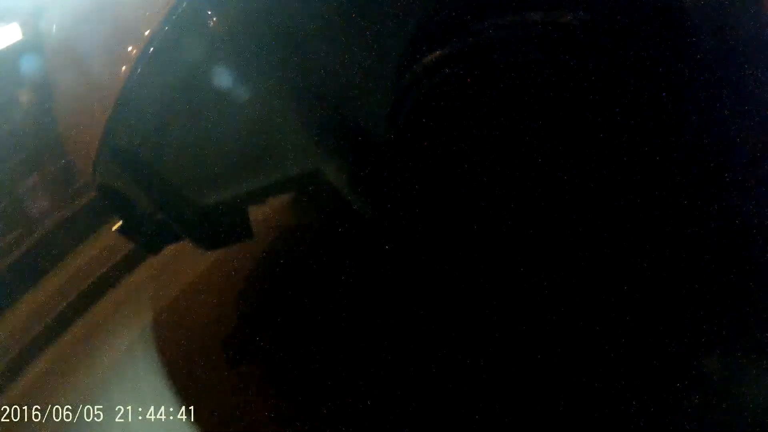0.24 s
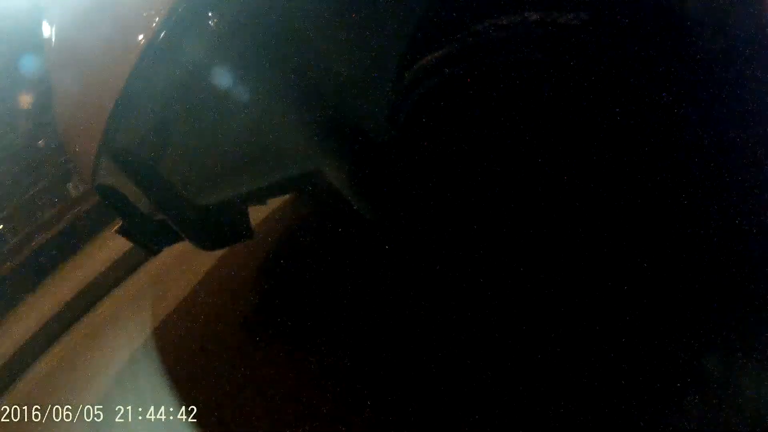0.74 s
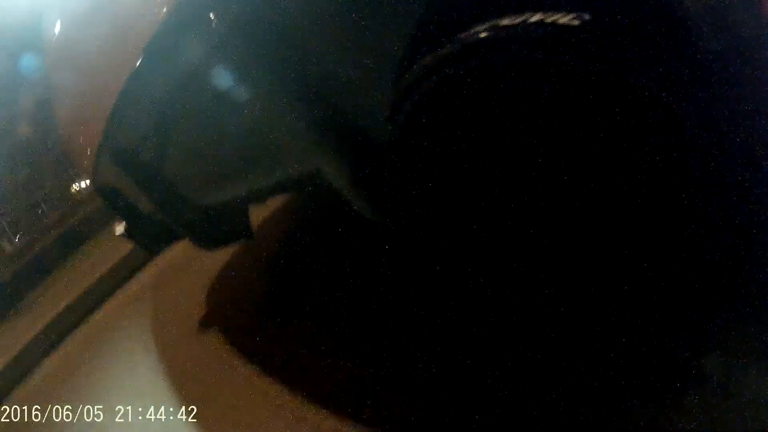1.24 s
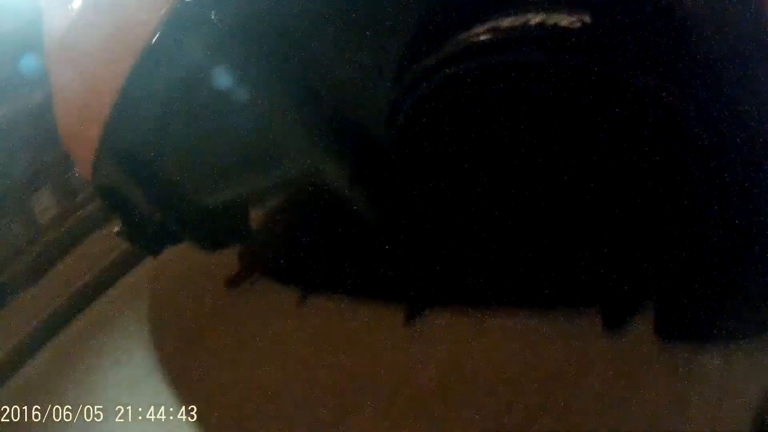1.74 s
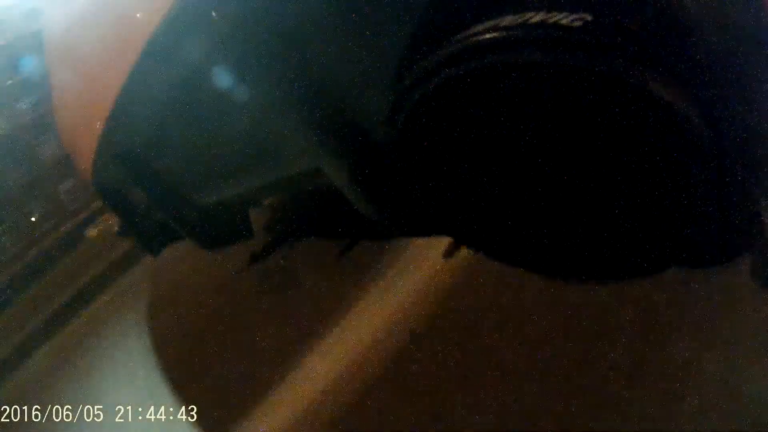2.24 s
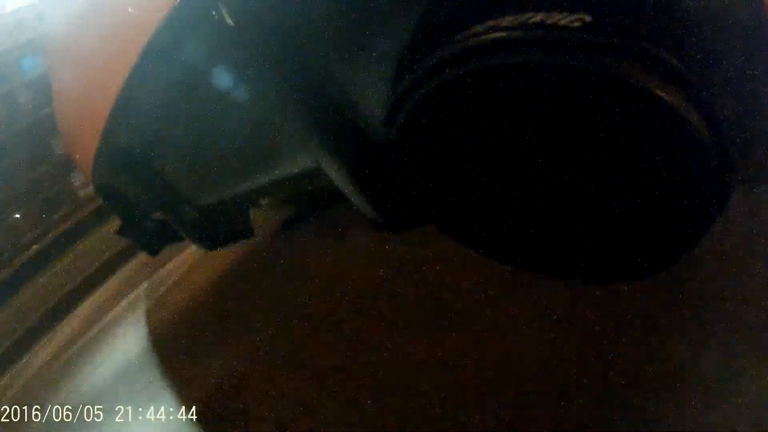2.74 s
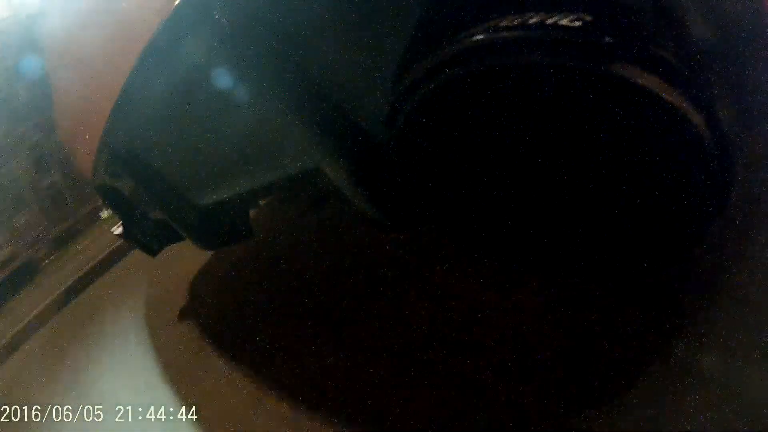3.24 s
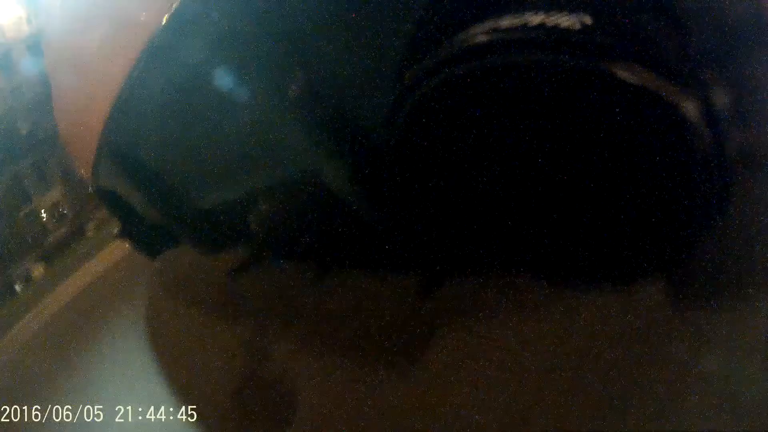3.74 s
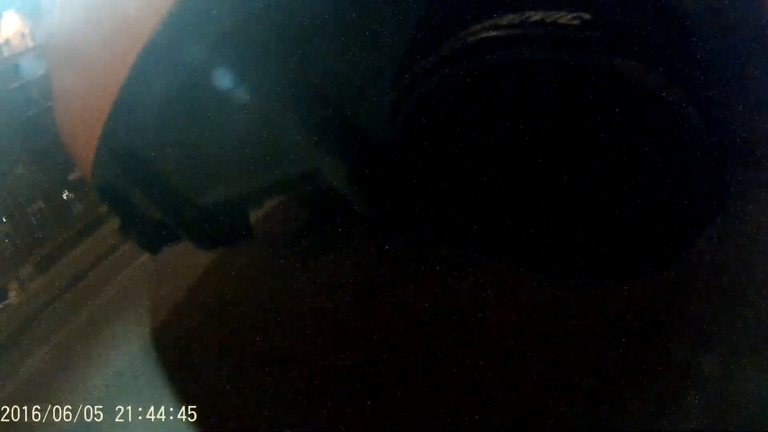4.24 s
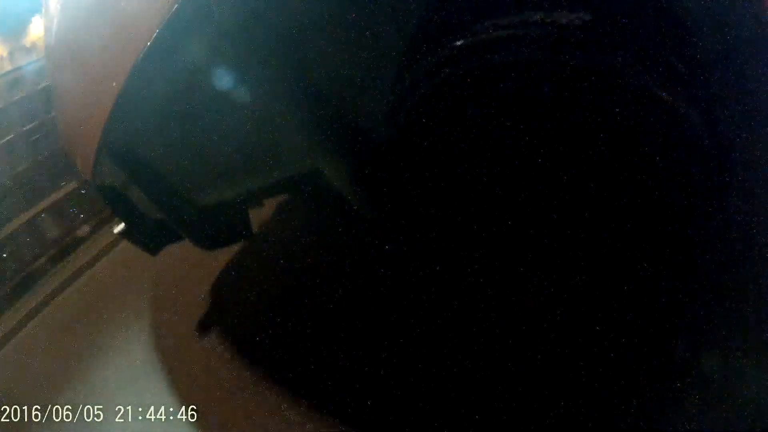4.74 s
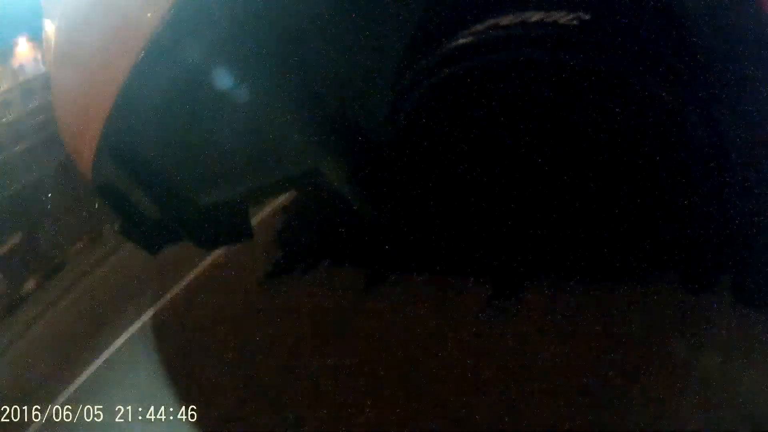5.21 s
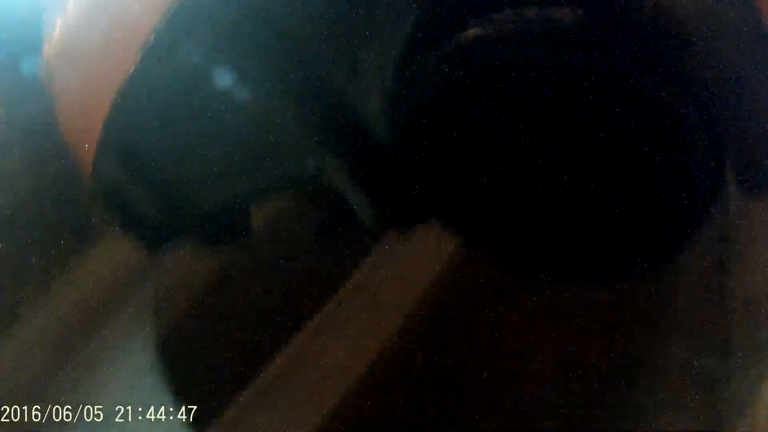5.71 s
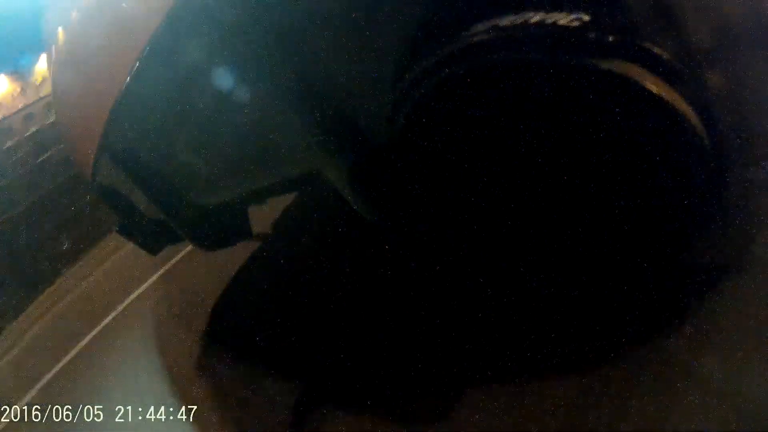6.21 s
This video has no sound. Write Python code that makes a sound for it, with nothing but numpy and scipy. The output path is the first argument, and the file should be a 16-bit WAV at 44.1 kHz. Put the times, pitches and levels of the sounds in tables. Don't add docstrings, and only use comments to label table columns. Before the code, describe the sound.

Right beside a moving car's tailpipe, a five-cylinder engine coasts with muffled, irregular burbles, then smooths out. It picks up with a few sharp cracks and pulls hard, its boom and raspy bark climbing until the small boxed camera microphone overloads. The throttle shuts abruptly; the note drones downward, then a cluster of pops breaks out before quiet coasting. Tyre roar, buffeting wind and faint hiss lie underneath.

```python
import sys
import numpy as np
from scipy import signal
from scipy.fft import rfft, irfft
from scipy.io import wavfile
from scipy.ndimage import uniform_filter1d, map_coordinates

SR = 44100
rng = np.random.default_rng(int(sys.argv[2]) if len(sys.argv) > 2 else 0)


def invert_db(x):
    u = np.asarray(x, float) / 20
    return 10 ** u


def waveform_to_disk(signal):
    frames = np.transpose(np.atleast_2d(signal))
    scaled = np.clip(frames, -1, 1) * 32767
    samples = np.round(scaled).astype(np.int16)
    wavfile.write(sys.argv[1], SR, samples)


N = 285327

# strength_db, lateness_ms
CYLINDERS = [
    [(1.8, 0), (-1.6, -1.), (-6., 2.15), (4.5, -1.05), (1.2, -.13)],
    [(2., -0.02), (-.7, -0.06), (-2.5, 0.1), (1., 0.08), (-0.3, -0.1)],
    [(3.0, 0.38), (0.9, -0.28), (-4.2, -0.22), (-0.6, -0.28), (-0.7, -0.1)],
    [(2.2, -.25), (.5, .21), (-1.4, .16), (-.8, -.21), (-.5, .09)],
]
# time_s, firing_rate_hz
FIRING_RATE = [(0, 127.3), (1.2, 119.1), (1.45, 118.3), (1.6, 120.8), (1.8, 125.1), (2.0, 132.3),
               (2.2, 142.3), (2.8, 170.4), (3.4, 197.7), (3.7, 210.1), (3.918, 211.1), (4.5, 170.6),
               (4.6, 162.1), (4.79, 138.1), (5.0, 135.7), (5.8, 124.6), (6.2, 115.0), (6.47, 111.3)]
# time_s, roughness_0_to_1, throttle_0_to_1,
# state (0 coasting, 1 picking up, 2 pulling, 3 lifted off at high speed)
RUNNING = [(0, .55, 0, 0), (.8, .1, 0, 0), (1.4, .07, 0, 0), (1.55, .35, .2, .5), (1.8, .15, .5, 1),
           (2.3, .3, .8, 1), (2.55, .2, 1, 2), (3.747, .36, 1, 2), (3.755, .2, .15, 3), (3.9, .07, 0, 3),
           (4.6, .05, 0, 3), (4.75, .2, 0, 3), (4.751, .2, 0, 0), (4.9, .12, 0, 0), (5.4, .1, 0, 0),
           (5.5, .3, 0, 0), (5.7, .25, 0, 0), (5.8, .07, 0, 0)]
# time_s, effort_db
EFFORT = [(0, -50), (.4, -46.5), (.625, -41), (1.25, -43.5), (1.5, -44), (1.875, -37), (2.125, -34),
          (2.4, -26.5), (2.75, -22), (3.0, -20.5), (3.2, -22), (3.747, -21.5), (3.755, -31.5), (4.0, -25.5),
          (4.25, -35.5), (4.69, -34), (4.8, -41), (6.47, -43)]
STRONG_FIRING_S = 2.756

# centre_hz, width_hz, level_db
OPEN_MODES = [(128, 17, 11.5), (144.4, 6.5, 11.5), (168.3, 40.2, 13), (198.4, 12, 1.5), (259, 64, 8.5),
              (284.7, 10, 3), (331.6, 66, 5), (383.7, 16, -10), (417.4, 16, -6.5), (486, 26, 11.5),
              (550, 37, -3)]
# centre_hz, width_hz, level_db
SHUT_MODES = [(120, 8.6, -32.5), (134, 20, -23.5), (153.8, 14, -18.5), (167.6, 34.2, -18.5), (200, 19, -29),
              (257, 10, -50), (268.3, 22, -33.5), (416.6, 40, -35), (577, 56, -25)]
THIRD_ORDER_DB, MISFIRE_DB = -9.5, -15.5
FLAP_HZ, FLAP_SPAN_HZ, FLAP_DB = 143.8, 1.2, -10
WAVER_DB = 11.5

# pitch_hz, level_db
OPEN_PIPE = [(60, -17), (155, 6.5), (270, 5), (350, -0.5), (485, 3.5), (560, -1), (660, -0.5), (750, 2.5),
             (960, 2), (1100, -12.5), (1250, -4), (1550, -46), (2050, -27), (5000, -91)]
# pitch_hz, level_db
SHUT_PIPE = [(60, -19), (120, 5.5), (265, 4), (340, -13.5), (450, 3.5), (520, -13.5), (580, 5), (650, -7.5),
             (720, -1.5), (850, -7), (975, -7), (1090, -26.5), (1300, -26), (5000, -99.5)]
LOW_DB, LOW_OPEN_DB = 1, 3.5
LOW_SLOPE = .6
SILENCED_HZ, SILENCED_SHARE = (200, 254), .8

# pitch_hz, level_db_per_hz
GAS = [(1250, -4), (1580, -18.5), (2060, -5.5), (2460, -19), (2700, -24), (3100, -25), (3750, -38.5),
       (4280, -32), (4900, -52.5), (5800, -48.5), (6400, -70.5), (6980, -49.5), (7400, -61.5),
       (10000, -81.5)]
GAS_OPEN_DB, GAS_DB_PER_HZ = -12.5, 0.0859
GAS_SHUT_DB = -22.5
GAS_ONSET = 0.37

# pitch_hz, level_db_per_hz
ROAD = [(50, -22), (120, 2.5), (175, -0.5), (260, -16), (360, -17.5), (450, -1), (540, -15), (620, -24),
        (830, -14), (1250, -12), (1630, -29.5), (2070, -34), (2600, -58.5), (4300, -60)]
# time_s, level_db
ROAD_LEVEL = [
    (0, -48),
    (.6, -46),
    (1.4, -44),
    (6.47, -43),
]
# time_s, peak_db
GUSTS = [(0.05, -43), (0.92, -44), (1.05, -39), (1.68, -40), (2.48, -36), (3.03, -37), (3.88, -30),
         (4.65, -44), (4.88, -52), (5.48, -28), (5.7, -33), (6.18, -53), (6.45, -62)]
GUST_S, BREEZE_DB, BREEZE_PULL_DB = 0.06, -49.5, 12
# pitch_hz, level_db_per_hz
HISS = [
    (20, 18.5),
    (2000, -0.5),
    (6000, -0.5),
    (12000, -1.5),
    (15000, 3),
    (16000, -11),
    (16500, -32),
]
HISS_DB = -67.5

# start_s, peak_db, pitch_hz, ring_s
BURBLES = [(0.041, -33, 120, 0.14), (0.124, -31.5, 277, 0.11), (0.207, -28, 154, 0.2),
           (0.239, -52, 248, 0.061), (0.296, -29.5, 287, 0.085), (0.381, -22, 269, 0.079),
           (0.43, -24, 156, 0.052), (0.491, -35.5, 312, 0.14), (0.521, -27, 121.5, 0.22),
           (0.543, -40, 130, 0.078), (0.582, -26, 142, 0.16), (0.608, -38, 122, 0.13),
           (0.648, -35, 116, 0.24), (0.678, -37, 268, 0.2), (0.721, -23, 168, 0.056),
           (0.79, -25, 148, 0.097), (1.487, -23.5, 470, 0.017), (1.56, -22, 128, 0.073),
           (5.439, -39, 134, 0.099), (5.499, -17, 171, 0.048), (5.569, -24.5, 445, 0.083),
           (5.696, -19.5, 184, 0.041)]
# start_s, peak_db, pitch_hz, treble_db, thud_db
CRACKS = [(1.6289, -26.5, 1400, -12, -29), (1.6322, -25, 1390, -31, -20), (1.6819, -40, 2070, -22, -3),
          (1.6851, -29, 1320, -14.5, -8), (2.2594, -34, 1330, -19, -30.5), (2.4204, -39, 1310, -22, -17.5),
          (2.7594, -23.5, 1820, -9.5, -21), (3.5574, -43.5, 2090, -34.5, -19),
          (3.8691, -25, 1380, -20, -17), (5.4715, -20.5, 1780, -45, -4), (5.4934, -33, 1770, -29, 1),
          (5.5054, -31, 1310, -10, -12), (5.5584, -39.5, 1320, -21.5, -10), (5.5864, -41.5, 1740, -20, -12),
          (5.5937, -30, 1320, -13.5, -17), (5.6244, -45, 1450, -16, 1), (5.6674, -45, 1430, -24, -8),
          (5.6785, -29.5, 1330, -32, -4)]
CRACK_RING_S = 0.023

# time_s, peak_db
OVERLOADS = [
    (2.7257, -44),
    (2.7555, -44),
    (2.8146, -36),
    (2.8437, -35.5),
    (2.8727, -39.5),
    (2.8893, -45.5),
    (3.0355, -50),
    (3.0634, -43.5),
]
CEILING = .9


def level(x, db=0):
    return x * invert_db(db) / np.sqrt(np.mean(x ** 2))


def colour(x, spectrum):
    hz, db = np.transpose(spectrum)
    size = 8192
    bins_hz = np.arange(size // 2 + 1) * SR / size
    log_gain = np.interp(np.log(bins_hz + 1), np.log(hz), db) * np.log(10) / 20
    cepstrum = irfft(log_gain)
    cepstrum[1:size // 2] *= 2
    cepstrum[size // 2 + 1:] = 0
    response = irfft(np.exp(rfft(cepstrum)))[:size // 2]
    return signal.fftconvolve(x, response)[:len(x)]


def band(x, lo_hz, hi_hz, order=2):
    return signal.sosfilt(signal.butter(order, [lo_hz, hi_hz], "band", fs=SR, output="sos"), x)


def walk(rate):
    hold = int(SR / rate)
    steps = np.repeat(rng.standard_normal(N // hold + 1), hold)
    return 1.3 * uniform_filter1d(uniform_filter1d(steps, hold), hold)[:N]


def add(out, s, sound):
    i = int(s * SR)
    out[i:i + len(sound)] += sound[:N - i]


def curves(table):
    s, *columns = np.transpose(table)
    return [np.interp(np.arange(N) / SR, s, c) for c in columns]


def clicks(at, size):
    early = np.bincount(at.astype(int), size * (1 - at % 1), N)
    late = np.bincount(at.astype(int) + 1, size * (at % 1), N)
    return early + late


def standing(modes, hz):
    return sum(invert_db(db) / (1 + (2 * (hz - centre) / width) ** 2) ** (3 / 2) for centre, width, db in modes)


def firings(hz, rough, state):
    phase = np.cumsum(hz) / SR
    phase += (-phase[int(STRONG_FIRING_S * SR)]) % 5
    k = np.arange(int(phase[0]) + 1, int(phase[-1]))
    chance = np.clip(rng.standard_normal((1500, 2))[k].T, -1.8, 1.8)
    even = np.interp(k, phase, np.arange(N))
    when = even.astype(int)
    pattern_db, late_ms = (map_coordinates(c, [state[when], k % 5], order=1)
                           for c in np.moveaxis(CYLINDERS, 2, 0))
    waver = walk(12)
    late_ms += rough[when] * (.3 * chance[0] + .8 * waver[when])
    at = np.clip(even + SR / 1000 * late_ms, 0, N - 2)
    size = invert_db(pattern_db + 5.5 * rough[when] * chance[1])
    return phase, even, at, size, waver


def pipe_boom(hz, effort_db, rough, throttle, phase, held, waver):
    pulling, misfire = throttle * invert_db(effort_db), (1 - throttle) * invert_db(MISFIRE_DB * rough)
    first, second, third = (pulling * standing(OPEN_MODES, n * hz) + misfire * standing(SHUT_MODES, n * hz)
                            for n in (1, 2, 3))
    first *= invert_db(FLAP_DB * (1 - np.tanh((hz - FLAP_HZ) / FLAP_SPAN_HZ)) / 2)
    second *= invert_db(WAVER_DB * rough * waver[::-1])
    third *= invert_db(WAVER_DB * rough * waver)
    boom = first * np.cos(2 * np.pi * phase + .5)
    boom += second * np.cos(4 * np.pi * phase - .4)
    boom += invert_db(THIRD_ORDER_DB) * third * np.cos(6 * np.pi * phase - .6)
    return boom * np.sqrt(2) * held ** (.3 * throttle)


def pipe_bark(hz, effort_db, rough, throttle, even, at, size, gate):
    turbulence = np.sqrt(rough) * level(gate * rng.standard_normal(N))
    blow = -np.sqrt((1 - rough) * SR / hz)
    drive = blow * clicks(at, size) + turbulence
    rung = throttle * colour(drive, OPEN_PIPE) + (1 - throttle) * colour(drive, SHUT_PIPE)
    highs = rung - band(rung, 10, 330)
    lows = band(colour(drive - blow * clicks(even, 1 + 0 * even), OPEN_PIPE), 40, 330)
    lows -= SILENCED_SHARE * (1 - throttle) * band(lows, *SILENCED_HZ, order=1)
    shut_low_db = LOW_DB - LOW_SLOPE * np.maximum(effort_db + 31.5, 0)
    low_db = throttle * LOW_OPEN_DB + (1 - throttle) * shut_low_db
    return invert_db(effort_db) * (highs + invert_db(low_db) * lows) / band(rung, 350, 1100).std()


def gas_rush(hz, effort_db, throttle, gate):
    rush = throttle ** GAS_ONSET
    open_db = effort_db + GAS_OPEN_DB + GAS_DB_PER_HZ * (hz - 170)
    shut_db = curves(ROAD_LEVEL)[0] + GAS_SHUT_DB
    gas_db = rush * open_db + (1 - rush) * shut_db
    gusty = gate * invert_db(walk(60)) * rng.standard_normal(N)
    return invert_db(gas_db + 1.5) * level(colour(gusty, [(500, -58.5)] + GAS))


def engine():
    (hz,), (effort_db,), (rough, throttle, state) = curves(FIRING_RATE), curves(EFFORT), curves(RUNNING)
    phase, even, at, size, waver = firings(hz, rough, state)
    held = np.interp(np.arange(N), even, size)
    gate = (1.4 + np.exp(-(phase % 1) / 0.29)) * held
    boom = pipe_boom(hz, effort_db, rough, throttle, phase, held, waver)
    bark = pipe_bark(hz, effort_db, rough, throttle, even, at, size, gate)
    return boom + bark + gas_rush(hz, effort_db, throttle, gate)


def tyre_roar():
    flutter = invert_db(.6 * walk(2.5) + 1.2 * walk(25))
    tone = [(16, -58.0)] + ROAD + [(5000, -78.5)]
    return level(colour(flutter * rng.standard_normal(N), tone)) * invert_db(curves(ROAD_LEVEL)[0])


def wind():
    rumble = level(band(rng.standard_normal(N), 16, 58))
    t = np.arange(N) / SR
    gusts = sum(invert_db(db) * np.exp(-((t - s) / GUST_S) ** 2) for s, db in GUSTS)
    breeze = invert_db(BREEZE_DB + BREEZE_PULL_DB * curves(RUNNING)[1])
    return rumble * invert_db(-5.5) * (gusts + breeze)


def recorder_hiss():
    return level(colour(rng.standard_normal(N), HISS), HISS_DB)


def burbles():
    out, t = np.zeros(N), np.arange(int(.12 * SR)) / SR
    for s, db, hz, ring in BURBLES:
        swell = np.exp(-np.log(1000) * t / ring) * (1 - np.exp(-t / 0.0014))
        puff = level(colour(rng.standard_normal(len(t)), SHUT_PIPE))
        add(out, s, invert_db(db) * swell * (np.sin(2 * np.pi * hz * t) + .55 * puff))
    return out


def cracks():
    out, t = np.zeros(N), np.arange(int(.12 * SR)) / SR
    fall = np.exp(-np.log(1000) * t / CRACK_RING_S)
    thud = 4.0 * band(np.exp(-((t - .0006) / 0.00036) ** 2), 150, 2500)
    for s, db, hz, treble_db, thud_db in CRACKS:
        noise = np.sign(rng.standard_normal((2, len(t)))) * fall
        ringing = 0.54 * fall * np.sin(2 * np.pi * hz * t)
        body = band(2.1 * noise[0] + ringing, 810, 2150, order=3)
        snap = band(noise[1], 2900, 4600) + invert_db(-20) * band(noise[1], 5200, 13000, order=1)
        add(out, s, invert_db(db) * (body + 4. * invert_db(treble_db) * fall * snap + invert_db(thud_db) * thud))
    return out


def scene():
    return (engine() + tyre_roar() + wind() + recorder_hiss() + burbles() + cracks())[None]


def overload(dry):
    wet = dry / (1 + (np.abs(dry) / CEILING) ** 8) ** (1 / 8)
    t = np.arange(-40, 41) / SR
    tick = np.gradient(np.exp(-(t / .00004) ** 2))
    for s, db in OVERLOADS:
        add(wet[0], s, invert_db(db + 5.5) * tick / tick.max())
    return wet


def top_cut(x):
    return signal.sosfilt(signal.butter(12, 16360, fs=SR, output="sos"), x)


def record(dry):
    return top_cut(overload(dry))


dry = scene()
out = record(dry)
waveform_to_disk(out)
```